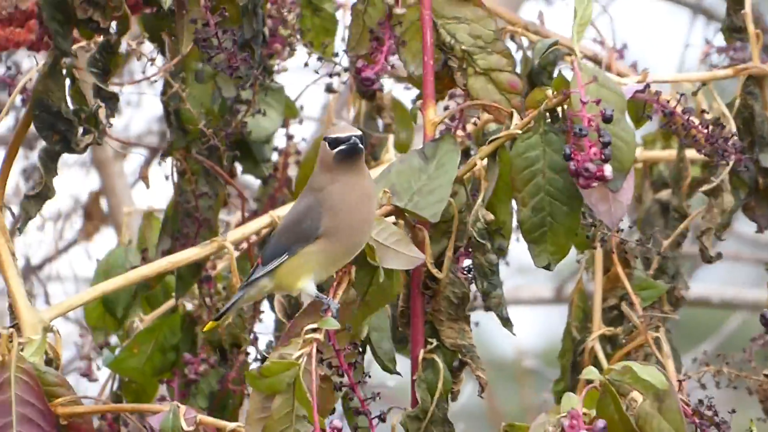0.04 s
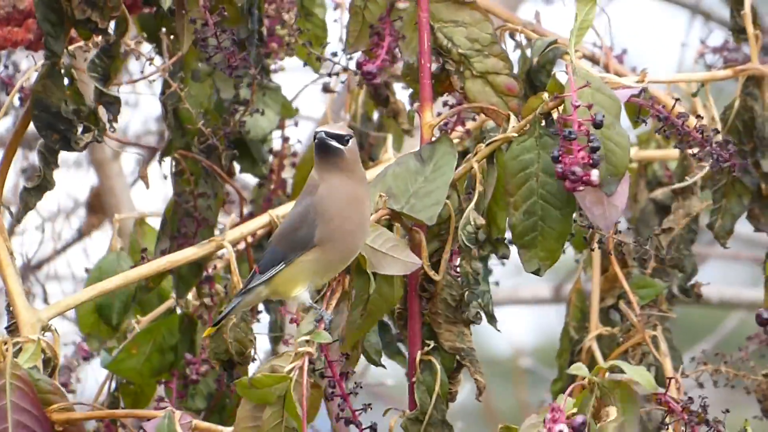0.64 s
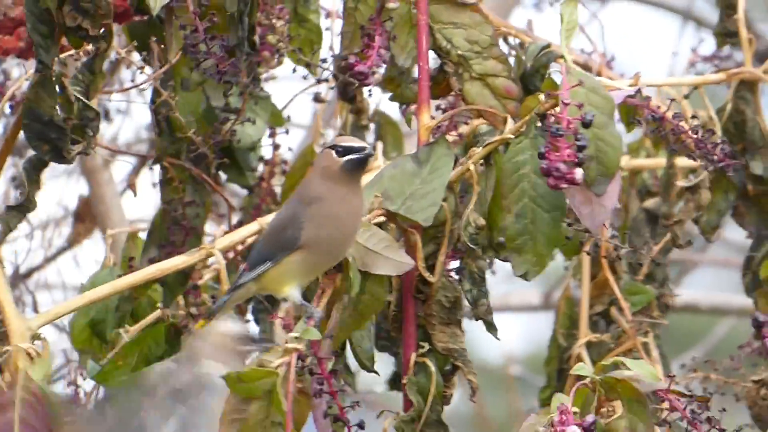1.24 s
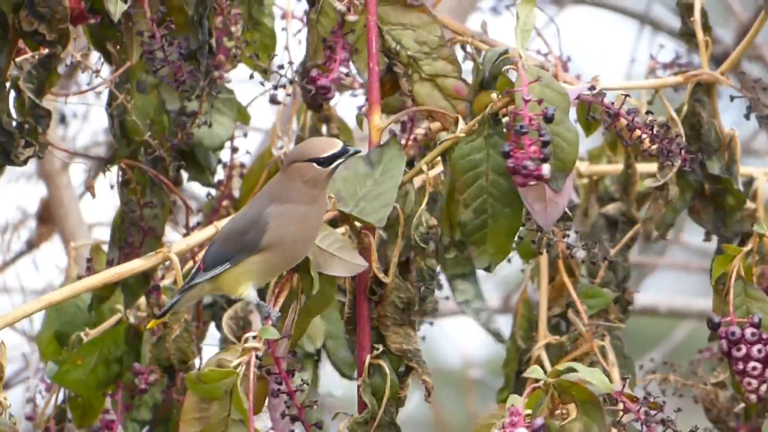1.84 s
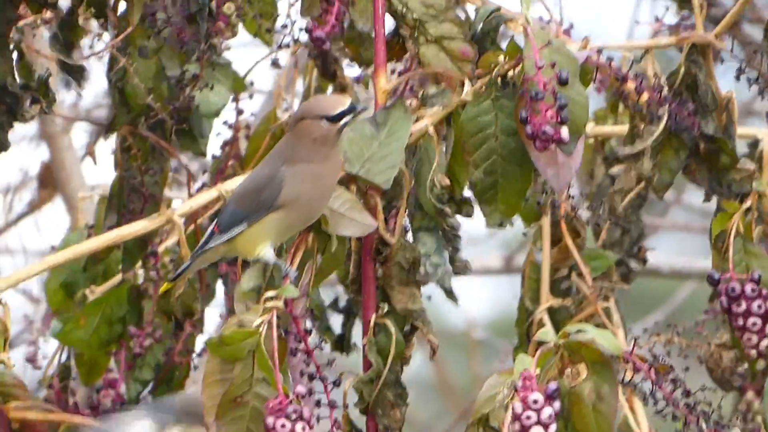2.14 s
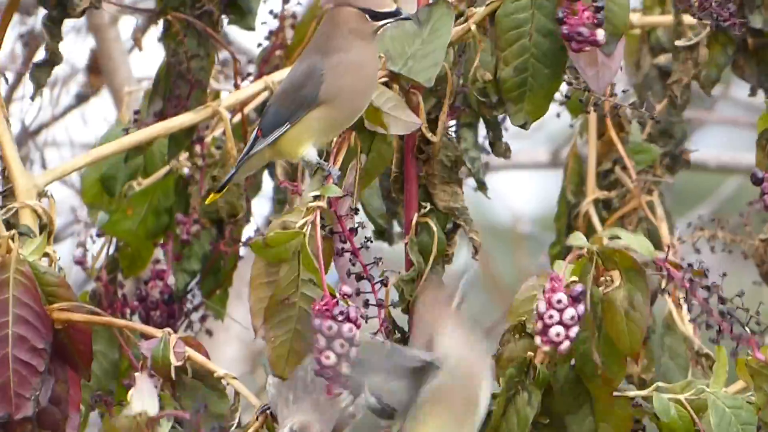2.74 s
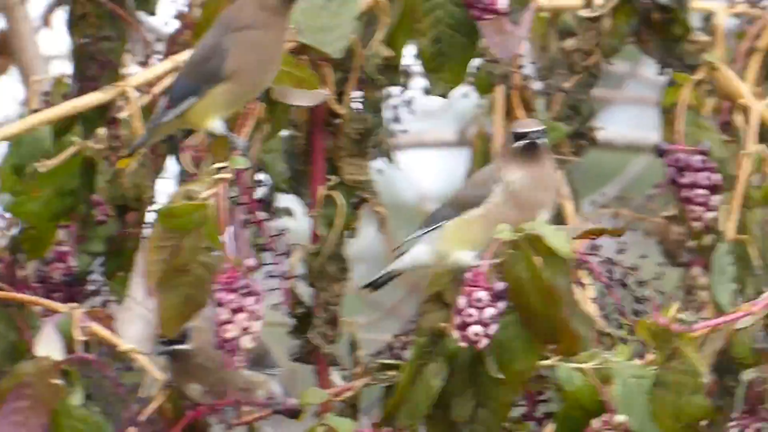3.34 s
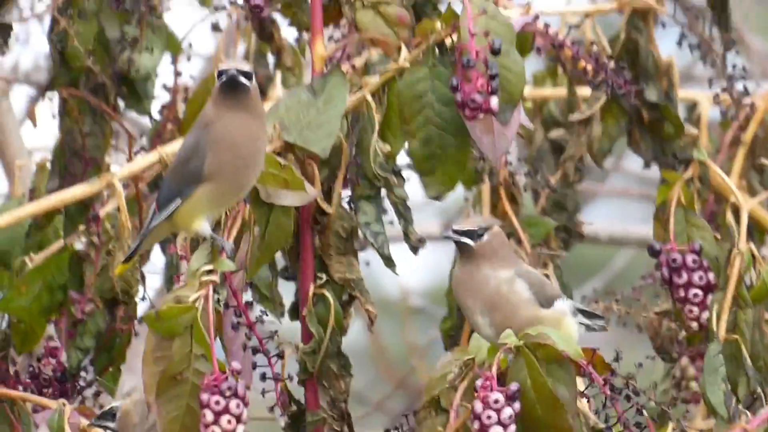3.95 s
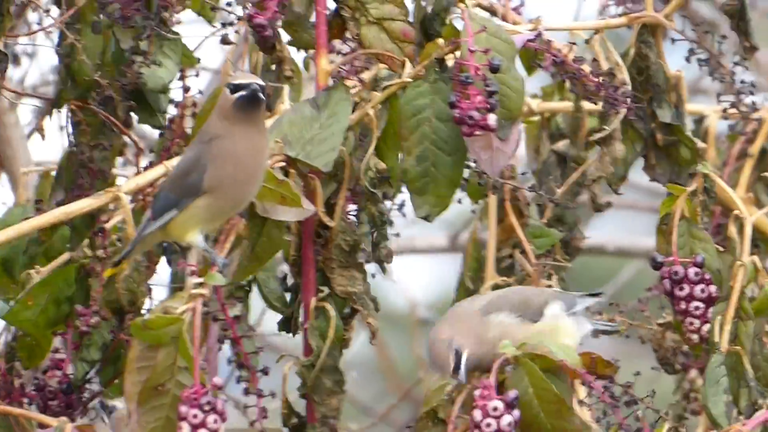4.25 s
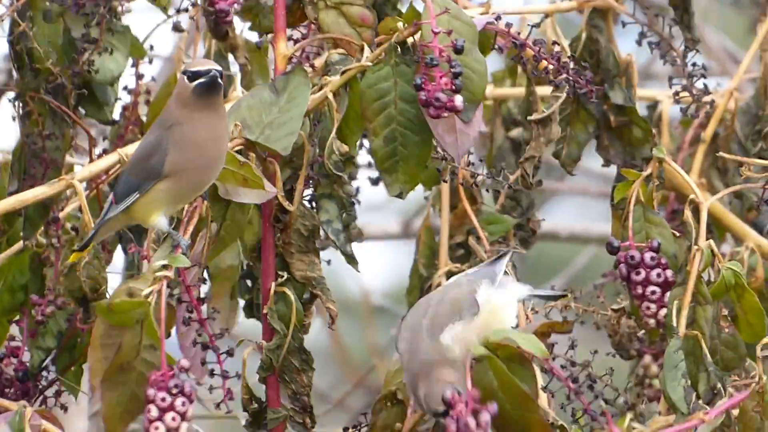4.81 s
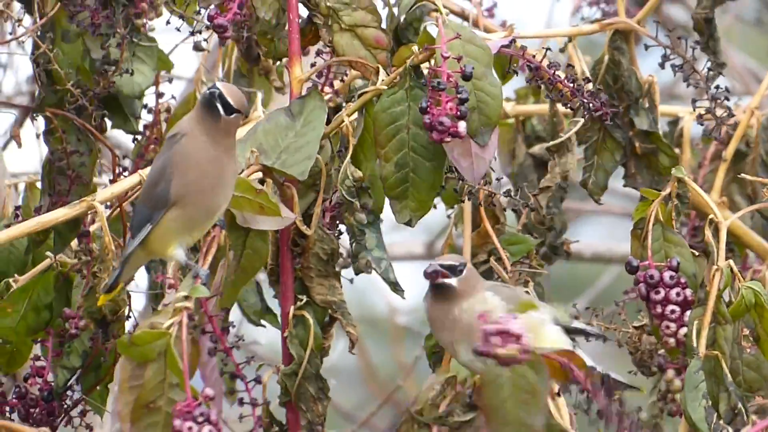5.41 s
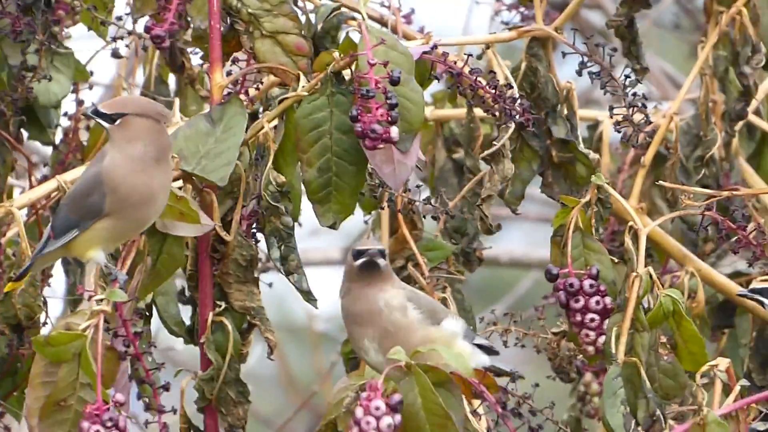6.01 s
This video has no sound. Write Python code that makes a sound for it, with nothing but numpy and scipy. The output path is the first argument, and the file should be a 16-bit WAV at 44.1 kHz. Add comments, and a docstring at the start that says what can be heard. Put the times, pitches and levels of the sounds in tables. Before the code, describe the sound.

Small birds trill thinly behind low wind buffeting the microphone, which dies away and leaves a faint road hum.

```python
"""A berry thicket in the wind, with a road in the distance.
Feeding waxwings give thin, high trills, a run of chips and one falling whistle, each a nearly pure tone
bent by the syrinx and scattered by the leaves. Eddies buffet the two ports of a camera microphone and
dry leaves stir. Then the wind drops and uncovers the traffic, one approaching car and a fine hiss."""
import sys
import numpy as np
from scipy import signal
from scipy.fft import rfft, irfft
from scipy.io import wavfile
from scipy.ndimage import uniform_filter1d

SR = 44100
rng = np.random.default_rng(int(sys.argv[2]) if len(sys.argv) > 2 else 0)


def to_wav(sig):
    """Store sig (one row per channel, or 1-D mono) as 16-bit WAV at the path in sys.argv[1].

    Samples outside -1..1 are clipped; the rate is SR.
    """
    pcm = np.clip(np.atleast_2d(sig), -1, 1) * 32767
    pcm = np.round(pcm).astype(np.int16)
    wavfile.write(sys.argv[1], SR, pcm.T)  # frames by channels


N = 272097
TIME = np.arange(N) / SR
BINS_HZ = np.fft.rfftfreq(N, 1 / SR)


def gain_of(db):
    """Decibels to amplitude."""
    return 10 ** (np.asarray(db) / 20)


def unit_rms(x):
    """Scales to rms 1."""
    return x / np.sqrt(np.mean(x ** 2) + 1e-20)


def curve_at(points, hz=BINS_HZ):
    """Reads a table along a log-frequency axis."""
    freq_hz, values = np.transpose(points)
    return np.interp(np.log(hz + 1), np.log(freq_hz + 1), values)


def automation(rows, t=TIME):
    """Every lane of an automation table at the times t."""
    time_s, *lanes = np.transpose(rows)
    return [np.interp(t, time_s, lane) for lane in lanes]


def add(mix, start_s, sound):
    """Mixes a sound in at start_s."""
    part = mix[..., max(round(start_s * SR), 0):][..., :sound.shape[-1]]
    part += sound[..., :part.shape[-1]]


def panned(pan_db):
    """Left and right gains of mean power 1; pan_db is left minus right."""
    pair = gain_of(np.array([[.5], [-.5]]) * pan_db)
    return pair / np.sqrt(np.mean(pair ** 2, 0))


def wander(hz):
    """Smooth random modulation of rms 1, up to about hz."""
    return unit_rms(irfft(rfft(rng.standard_normal(N)) * np.exp(-(BINS_HZ / hz) ** 2), N))


def stereo_noise(eq_db, correlation):
    """Coloured noise whose stereo width follows a left-right correlation curve."""
    left, independent = rfft(rng.standard_normal((2, N)))
    alike = np.clip(curve_at(correlation), -1, 1)
    right = alike * left + np.sqrt(1 - alike ** 2) * independent
    return unit_rms(irfft(np.array([left, right]) * gain_of(eq_db), N))


# Tone of the hiss: freq_hz, level_db
HISS_EQ = [(1500, 7), (2700, 2), (4500, 0), (5150, -1), (5450, -9.5), (5800, -5), (6150, 1.5), (7200, -4),
           (8400, -6), (9100, -2), (10600, -3), (12800, -8.5), (14000, -12), (15300, -12)]
# Stereo image of the hiss, also used for the leaves: freq_hz, correlation
HISS_IMAGE = [(3000, 0.071), (4500, 0.32), (6500, 0.55), (15000, 0.73)]
# Faint whines in the hiss: centre_hz, width_hz, boost_db
HISS_WHINES = [(2424, 76, 8.5), (3844, 120, 6), (4040, 660, 2.5), (4890, 130, 3), (10140, 200, 2.5)]
# Fader ride of the hiss: time_s, level_db
HISS_FADER = [(0, -60), (.45, -58.5), (.97, -61), (1.4, -59), (3.3, -60), (6.17, -60)]


def hiss():
    """The camera's own fine hiss with a few faint whines."""
    whines_db = sum(db * np.exp(-(2 * (BINS_HZ - hz) / width) ** 2) for hz, width, db in HISS_WHINES)
    return gain_of(automation(HISS_FADER)[0]) * stereo_noise(curve_at(HISS_EQ) + whines_db, HISS_IMAGE)


# Fader ride of the road bed: time_s, level_db
ROAD_FADER = [(0, -47), (2.2, -49), (6.17, -49)]
# Tone of the road bed: freq_hz, level_db
ROAD_EQ = [(30, -18), (60, -4), (125, 11), (200, 4), (330, 1), (600, -15), (900, -3), (1200, 0.2),
           (1500, -2), (2000, -8), (2300, -17), (2700, -34), (4000, -69)]
# Stereo image of road and car: freq_hz, correlation
TRAFFIC_IMAGE = [(60, 0.62), (130, 1), (300, 1), (640, 0.74), (1400, 0), (2500, 0.38)]
# Swell of the approaching car: time_s, level_db
CAR_FADER = [(5.3, -51), (5.7, -51), (5.95, -48), (6.17, -44.5)]
# Tone of its tyres: freq_hz, level_db
CAR_EQ = [(60, -40), (200, -1.5), (500, 4.5), (800, 5.5), (1100, 2), (1600, -16), (4000, -64)]


def traffic(waver_db=1.28, road_pan_db=-2.5):
    """The even roar of a distant road, and the tyres of one car drawing nearer at the end."""
    road = gain_of(automation(ROAD_FADER)[0]) * stereo_noise(curve_at(ROAD_EQ), TRAFFIC_IMAGE)
    car = gain_of(automation(CAR_FADER)[0]) * stereo_noise(curve_at(CAR_EQ), TRAFFIC_IMAGE)
    return (road * panned(road_pan_db) + car) * gain_of(waver_db * wander(26))


# Fader ride of the dry leaves: time_s, level_db
RUSTLE_FADER = [(0, -66.5), (.35, -66.5), (.9, -73), (2.5, -74.5), (3.6, -73), (5, -82)]
# Tone of the leaves: freq_hz, level_db
RUSTLE_EQ = [(1200, -25), (2200, 0.5), (3000, -2.5), (5000, -4.5), (5800, -15.5), (12000, -22)]


def rustle(flicker_db=4.0, flicker_hz=70):
    """Dry leaves stir faintly and settle as the wind drops."""
    flicker = unit_rms(gain_of(flicker_db * wander(flicker_hz)))
    return gain_of(automation(RUSTLE_FADER)[0]) * flicker * stereo_noise(curve_at(RUSTLE_EQ), HISS_IMAGE)


# One long gust; edge is the small, sharp eddies against the bass: time_s, level_db, edge_db, pan_db
GUST_LANES = [(0, -22.5, -10.5, 4), (.09, -23, -13, 2.5), (.14, -26, -23, 1), (.38, -23, -12.5, 13),
              (.5, -25.5, -17, 1), (.62, -20.5, -7, 3), (.88, -20, -8, 5.5), (1.06, -24.5, -8.5, 3),
              (1.5, -24, -16, 2.5), (1.93, -23.5, -17, 4.5), (2.18, -33, -25.5, 2.5),
              (2.26, -29.5, -20.5, 0), (2.42, -26, -14.5, 7.5), (2.6, -31, -18, 4), (2.77, -28.5, -19, 1.5),
              (3.01, -29, -21, 6.5), (3.25, -17, -10.5, 4.5), (3.31, -29, -9, 8), (3.42, -23.5, -21, -5.5),
              (3.63, -21, -3, 5), (3.83, -26.5, -8, 3.5), (3.96, -22.5, -6.5, 2.5), (4.25, -25, -19, -9.5),
              (4.55, -28.5, -16.5, 0), (4.71, -24.5, -29, 8.5), (4.76, -37.5, -28, 7)]
# Last puffs in the lull: centre_s, level_db, pan_db
LULL_PUFFS = [(4.883, -28, 3), (4.988, -31.5, -0.5), (5.079, -34, 21), (5.19, -40.5, -5), (5.265, -38.5, 1),
              (5.7, -50, 0)]


def gust(fall_db_per_s=33, puff_s=0.034, lull_edge_db=-43, dulling_s=0.092):
    """Level, pan and edge of the wind in dB: the gust dulls and dies away in a few puffs."""
    level_db, edge_db, pan_db = automation(GUST_LANES)
    lull_s = np.maximum(TIME - GUST_LANES[-1][0], 0)
    power = (gain_of(level_db - fall_db_per_s * lull_s) * panned(pan_db)) ** 2
    for centre_s, db, puff_pan_db in LULL_PUFFS:
        puff = gain_of(db) * np.exp(-((TIME - centre_s) / puff_s) ** 2)
        power += (puff * panned(puff_pan_db)) ** 2
    left, right = power + 1e-20
    edge_db += (lull_edge_db - edge_db) * np.minimum(lull_s / dulling_s, 1)
    return 10 * np.log10((left + right) / 2), 10 * np.log10(left / right), edge_db


# Tone of the wind rumble: freq_hz, level_db
WIND_EQ = [(25, -26), (48, -20), (65, -21), (90, -7.5), (125, -1), (180, 2), (250, 1.5), (330, -1),
           (450, -7.5), (600, -17.5), (800, -25), (1200, -34.5), (2000, -59.5), (4000, -86)]


def wind(trim_db=0.31, split_hz=370, throb_hz=60, bass_throb_db=2.0, edge_throb_db=3,
         edge_boost_db=8.0, edge_pan_db=3.0, surge_db=1.3, surge_hz=14):
    """Turbulence at each port: large eddies make a throbbing bass, small ones a rougher edge."""
    gust_db, pan_db, edge_db = gust()
    flow = rfft(stereo_noise(curve_at(WIND_EQ), correlation=[(100, 0.64), (350, 0.31), (850, 0.95)]))
    lowpass = 1 / (1 + (BINS_HZ / split_hz) ** 4)
    bass = unit_rms(irfft(flow * lowpass, N))
    edge = unit_rms(irfft(flow * (1 - lowpass), N))
    throb = np.array([wander(throb_hz), wander(throb_hz)])
    throb += 0.82 * wander(throb_hz)  # felt at both ports
    throb = np.clip(unit_rms(throb - uniform_filter1d(throb, SR // 10)), -2, 2)  # keep the quick throbs
    edge_throb = unit_rms(throb + wander(120))
    bass = bass * unit_rms(gain_of(bass_throb_db * throb)) * panned(pan_db)
    edge = edge * unit_rms(gain_of(edge_throb_db * edge_throb)) * panned(pan_db + edge_pan_db)
    edge_gain = gain_of(edge_db + edge_boost_db)
    blend = (bass + edge_gain * edge) / np.sqrt(1 + edge_gain ** 2)  # equal-power crossfade
    surge = wander(surge_hz)
    surge = unit_rms(surge - uniform_filter1d(surge, SR // 5))  # several swells a second
    return gain_of(gust_db + trim_db + surge_db * surge) * blend


# Thumps of single hard eddies: start_s, level_db, start_pitch_hz, pan_db
BUFFET_HITS = [(0.067, -20, 320, -6), (.352, -15, 910, 9), (.555, -16.5, 830, 10), (0.792, -11, 834, 6),
               (.947, -14, 1185, 1.5), (0.991, -9, 470, 5), (1.034, -21, 1410, 5.5),
               (1.145, -16.5, 1100, 6), (1.628, -10.5, 910, 8.5), (2.398, -8, 365, 3.5),
               (2.521, -15, 497, 9.5), (3.186, -10.5, 710, 7), (3.228, -12.5, 413, 0),
               (3.246, -19.5, 1390, 3.5), (3.278, -16, 744, 9), (3.568, -11, 724, 3), (3.737, -12, 514, 4),
               (4.168, -9.5, 390, -7), (4.496, -14, 494, 17), (4.681, -14, 330, 5), (4.875, -25, 414, 8),
               (5.076, -18.5, 256, 14), (5.114, -23, 1190, 8), (6.037, -26.5, 305, -15)]


def buffets(trim_db=-1, slowing_s=0.003, end_hz=165, fade_s=0.0077):
    """A hard eddy strikes a port: a quick flutter of pressure that slows into one low push."""
    out, t = np.zeros((2, N)), np.arange(SR // 25) / SR
    for start_s, db, start_hz, pan_db in BUFFET_HITS:
        cycles = np.cumsum(end_hz + (start_hz - end_hz) * np.exp(-t / slowing_s)) / SR
        attack = 1 - np.exp(-(2 * cycles) ** 2)  # swells within the first half cycle
        thump = attack * np.exp(-(t / fade_s) ** 2) * np.sin(2 * np.pi * cycles)
        add(out, start_s, gain_of(db + trim_db) * panned(pan_db) * thump)
    return out


# Phase by which the right port trails the left: freq_hz, lag_rad
PORT_PHASE = [(150, -0.5), (340, 1), (750, 2.5), (1500, 3.5), (2200, 1.5)]


def ports(pressure):
    """Small eddies press on one port while they pull on the other."""
    left, right = pressure
    lag_rad = curve_at(PORT_PHASE, np.fft.rfftfreq(2 * N, 1 / SR))
    return np.array([left, irfft(rfft(right, 2 * N) * np.exp(-1j * lag_rad))[:N]])


def thicket(calls, leaves_db, leaves_t60_s=0.11, yard_db=-17, yard_t60_s=.4, echoes_per_s=3000):
    """Leaves close by scatter the calls; the yard adds a faint tail."""
    t = np.arange(SR // 2) / SR
    shape = (2, 2, len(t))  # leaves or yard, port, time
    taps = rng.standard_normal(shape) * (rng.random(shape) < echoes_per_s / SR) * (t > .002)
    taps = taps + 0.29 * taps[:, ::-1]  # the two ports share part of each echo
    reverb = np.zeros((2, len(t)))
    for echoes, db, t60_s in zip(taps, (leaves_db, yard_db), (leaves_t60_s, yard_t60_s)):
        tail = echoes * gain_of(-60 * t / t60_s)
        reverb += gain_of(db) * tail / np.linalg.norm(tail[0])
    return calls + signal.fftconvolve(calls[None], reverb, axes=1)[:, :N]


def syrinx(pitch_hz, octave_db):
    """The bird's voice: a nearly pure tone with a weak octave."""
    phase = 2 * np.pi * np.cumsum(pitch_hz) / SR
    return np.sqrt(2) * (np.sin(phase) + gain_of(octave_db) * np.sin(2 * phase))


# Contour of the falling whistle: time_s, pitch_hz, level_db
WHISTLE_CONTOUR = [(4.38, 8560, -66), (4.41, 8620, -64), (4.465, 8000, -66.5), (4.49, 7800, -70),
                   (4.55, 7620, -63), (4.585, 7520, -74), (4.64, 7200, -78)]


def whistle(jitter_hz=35, flutter_db=2, octave_db=-17):
    """A waxwing slides down one thin note."""
    span = np.arange(round(WHISTLE_CONTOUR[0][0] * SR), round(WHISTLE_CONTOUR[-1][0] * SR))
    hz, db = automation(WHISTLE_CONTOUR, TIME[span])
    tone = syrinx(hz + jitter_hz * wander(250)[span], octave_db)
    out = np.zeros(N)
    out[span] = tone * gain_of(db + flutter_db * wander(80)[span]) * signal.windows.tukey(len(span), .06)
    return out


def chip_syllables(start_s=1.93, count=7, every_s=.0198, length_s=0.012, pitch_hz=7610,
                   glide_hz=780, sag_hz=680, level_db=-52.5, hold_s=.042, fade_s=0.016, weakest=0.28):
    """Quick upswept chips: a few at full strength, then fading and flattening as the effort drops."""
    for t in np.arange(count) * every_s:
        effort = weakest + (1 - weakest) * np.exp(-max(t - hold_s, 0) / fade_s)
        bend = np.sqrt(effort)
        db = level_db + 20 * np.log10(effort)
        yield start_s + t, length_s, pitch_hz, glide_hz * bend, sag_hz * bend, db


# Trill cues; pitch is the low arch's, fade is the drop half a trill away from the peak:
# start_s, arch_count, pair_s, pitch_hz, climb_hz, depth_ratio, peak_db, peak_fraction, fade_db
TRILL_CUES = [(0.69, 8, 0.038, 7020, 0, 0.54, -63.5, .9, 0.5),
              (1.334, 12, 0.036, 7120, 480, 1, -53, 0.44, 13), (1.75, 8, 0.03, 6850, 0, 1, -53, 0.4, 3),
              (2.529, 9, .038, 7100, -8, 0.7, -57.5, 0.26, 0), (2.945, 3, .038, 7050, 0.5, .8, -62.5, 0, 3),
              (3.587, 10, 0.033, 7020, 500, 1, -68.5, .55, 2), (4.057, 7, .042, 7600, 0, .4, -72, .3, 2),
              (4.171, 8, .036, 7000, 453.5, 1, -70, .4, 4)]


def trill_syllables(climb_s=0.084, low_share=0.43, low_glide_hz=-130, low_sag_hz=272,
                    high_share=0.37, high_step_hz=500, high_sag_hz=400, high_db=-2):
    """High and low arches alternate at an even pace, climb to their pitch, swell and fade."""
    for start_s, arch_count, pair_s, pitch_hz, climb_hz, depth, peak_db, peak_at, fade_db in TRILL_CUES:
        for k in range(arch_count):
            t = k * pair_s / 2
            hz = pitch_hz - climb_hz * np.exp(-t / climb_s)
            db = peak_db - fade_db * (2 * (k / (arch_count - 1) - peak_at)) ** 2
            if k % 2:
                yield start_s + t, low_share * pair_s, hz, depth * low_glide_hz, depth * low_sag_hz, db
            else:
                high_hz = hz + depth * high_step_hz
                yield start_s + t, high_share * pair_s, high_hz, 0, depth * high_sag_hz, db + high_db


# Drawn-out notes that lead into a trill: start_s, length_s, pitch_hz, level_db
LEAD_IN_NOTES = [(1.295, .028, 6420, -57), (1.603, 0.047, 6560, -51.5), (1.65, 0.057, 6840, -54),
                 (1.725, 0.017, 7020, -52.5), (3.556, .017, 6400, -67), (4.14, .035, 6320, -69)]


def syllables(scatter_hz=45, glide_scatter_hz=130, scatter_db=2.3, lead_glide_hz=40, lead_sag_hz=20):
    """Arches and chips, no two quite alike, and the nearly level lead-in notes."""
    for centre_s, length_s, hz, glide_hz, sag_hz, db in [*trill_syllables(), *chip_syllables()]:
        hz += scatter_hz * rng.standard_normal()
        glide_hz += glide_scatter_hz * rng.standard_normal()
        db += scatter_db * rng.standard_normal()
        yield centre_s, length_s, hz, glide_hz, sag_hz, db
    for start_s, length_s, hz, db in LEAD_IN_NOTES:
        yield start_s + length_s / 2, length_s, hz, lead_glide_hz, lead_sag_hz, db


def trills(trim_db=-1.5, jitter=0.36, flutter_db=3.5, hook=1.2, spill_s=0.0019,
           octave_db=-25, bright_db=11, near_db=-62, far_db=-71):
    """Near and far waxwing stems: each syllable is an arch of pitch, hooked down at its ends."""
    stems, shake, flutter = np.zeros((2, N)), wander(350), wander(300)
    for centre_s, length_s, hz, glide_hz, sag_hz, db in syllables():
        half_s = length_s / 2 + spill_s
        span = np.arange(round((centre_s - half_s) * SR), round((centre_s + half_s) * SR))
        position = np.linspace(-1, 1, len(span))
        droop = position ** 2 + hook * (position ** 4 - .12) + jitter * shake[span]
        pitch_hz = hz + glide_hz * position / 2 - sag_hz * droop
        upsweep = np.clip(glide_hz / 350, 0, 1) ** 2  # rising chips are brighter
        tone = syrinx(pitch_hz, octave_db + bright_db * upsweep)
        strain = min(.3 + sag_hz / 350, 1.2)  # level notes are clean, strongly bent ones buzz
        loudness = gain_of(db + trim_db + strain * flutter_db * flutter[span])
        note = tone * loudness * signal.windows.tukey(len(span), 0.33)
        far = np.interp(db, [far_db, near_db], [1, 0])  # faint syllables come from deep in the thicket
        stems[:, span] += np.outer([1 - far, far], note)
    return stems


def scene(far_trim_db=-1.0):
    """The mix: birds in the thicket, wind on the microphone, and leaves, road and hiss behind."""
    near, far = trills()
    birds = thicket(near + whistle(), leaves_db=-8) + gain_of(far_trim_db) * thicket(far, leaves_db=-2)
    return birds + ports(wind() + buffets()) + rustle() + traffic() + hiss()


def record(dry, low_cut_hz=68, high_cut_hz=15600):
    """The microphone's low cut, then a steep band limit on the top end."""
    low_cut = signal.butter(3, low_cut_hz, "highpass", fs=SR, output="sos")
    high_cut = signal.firwin(511, high_cut_hz, window=("kaiser", 9), fs=SR)
    return signal.oaconvolve(signal.sosfilt(low_cut, dry), high_cut[None], "same")


dry = scene()
out = record(dry)
to_wav(out)
```